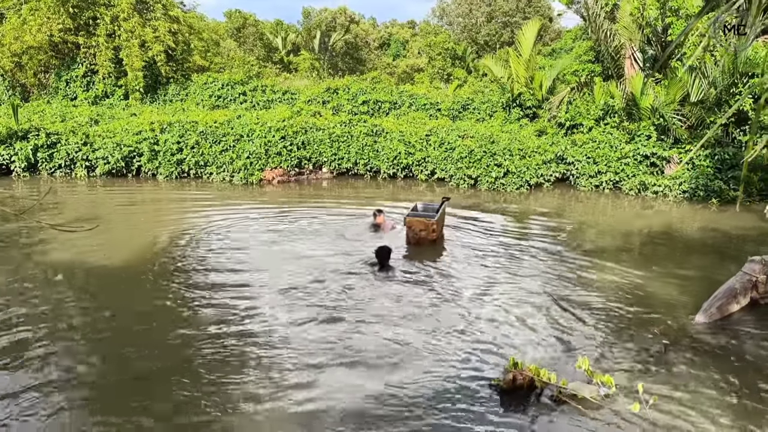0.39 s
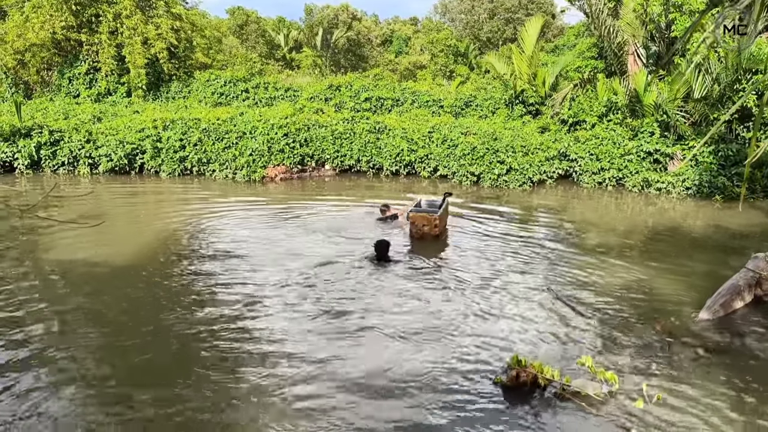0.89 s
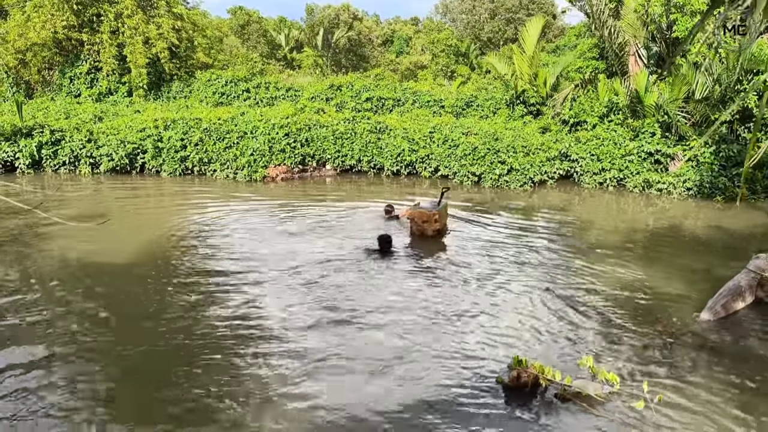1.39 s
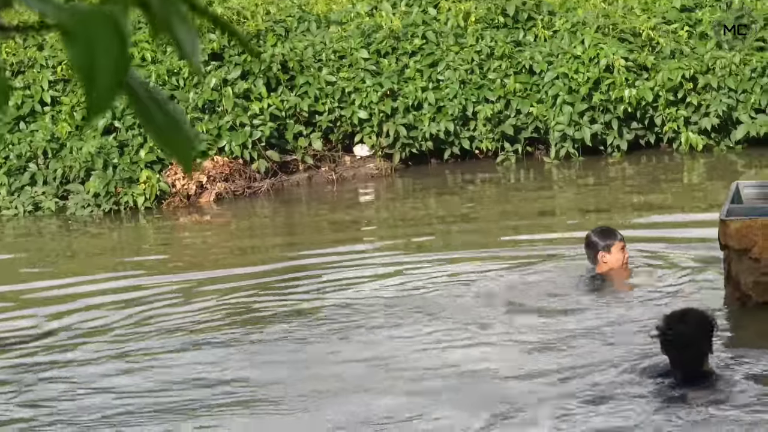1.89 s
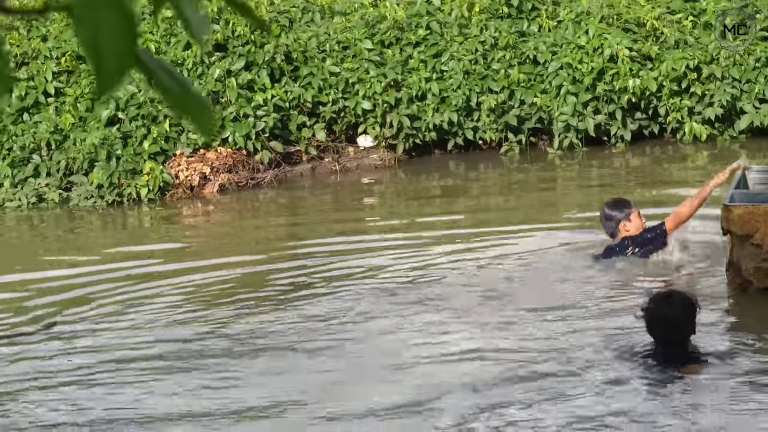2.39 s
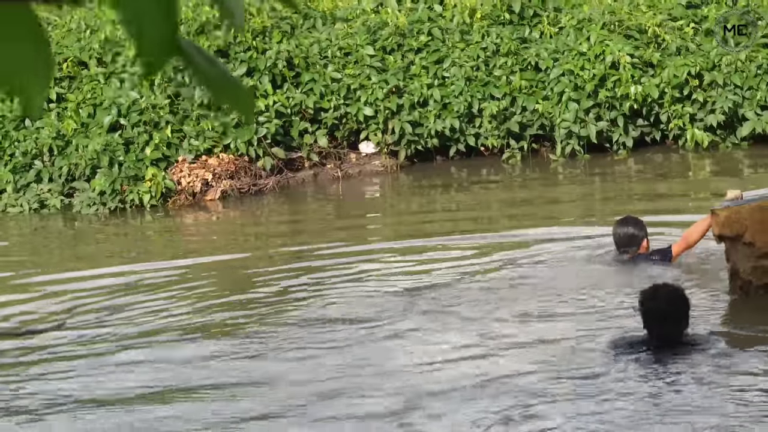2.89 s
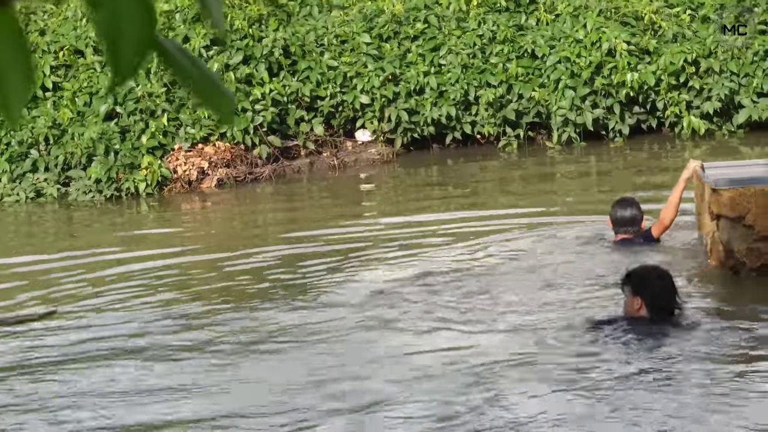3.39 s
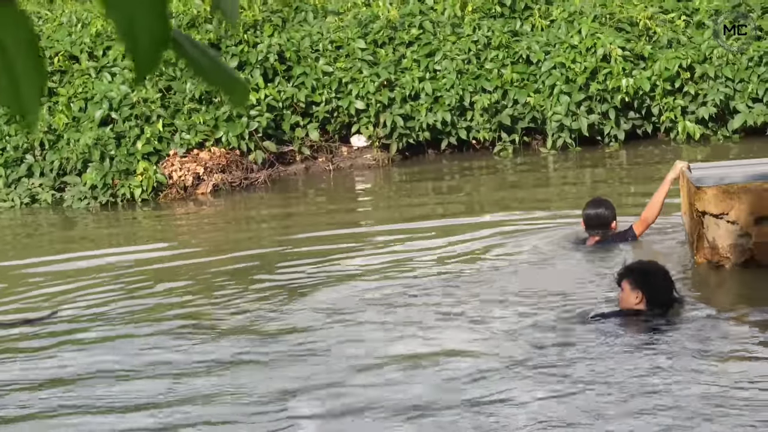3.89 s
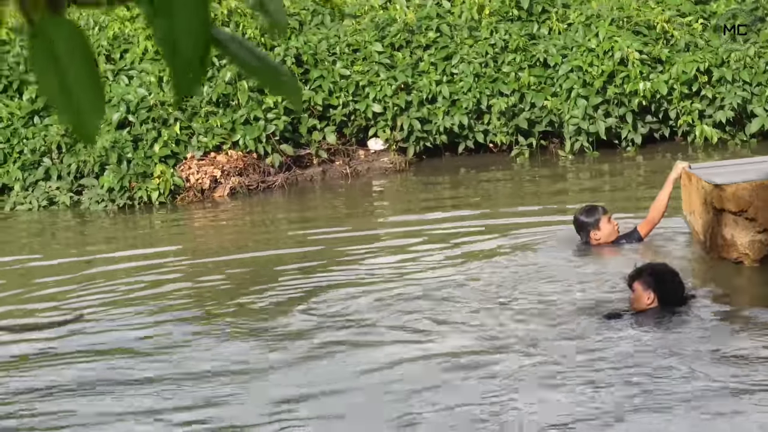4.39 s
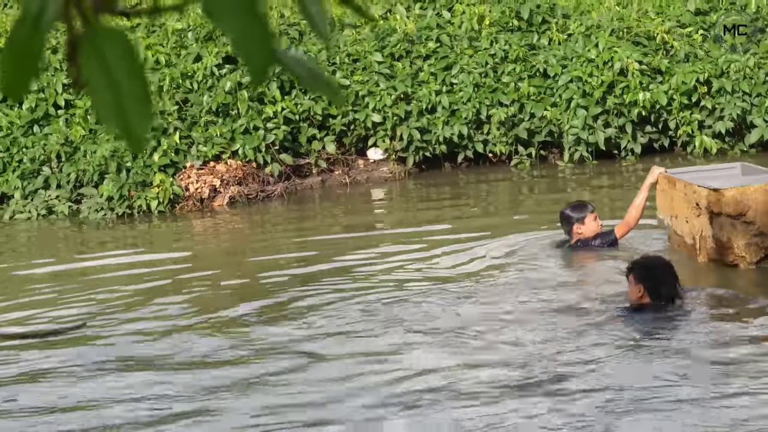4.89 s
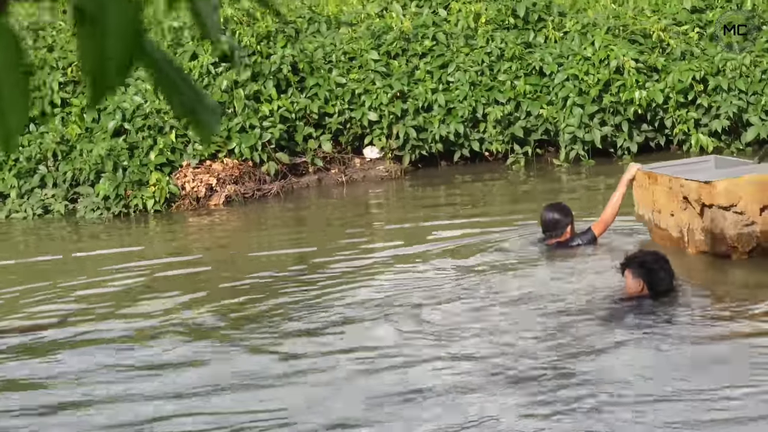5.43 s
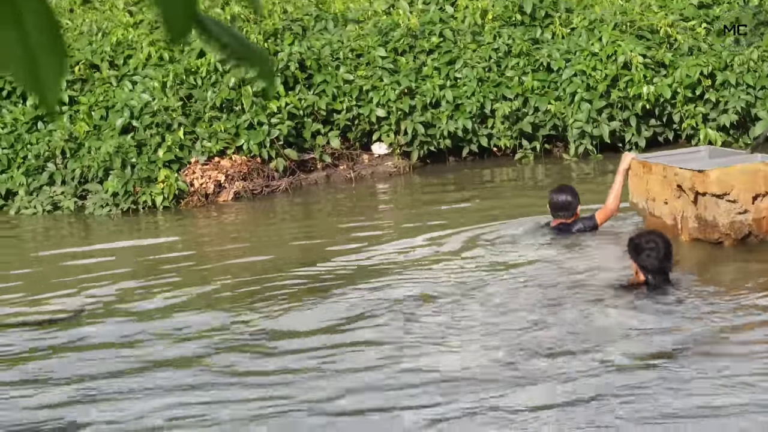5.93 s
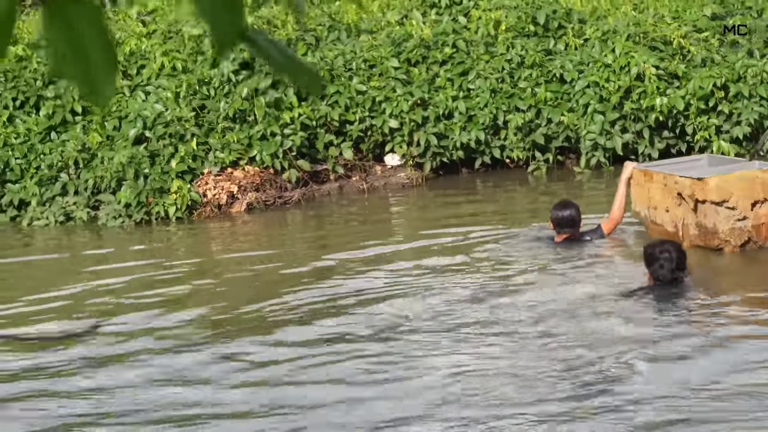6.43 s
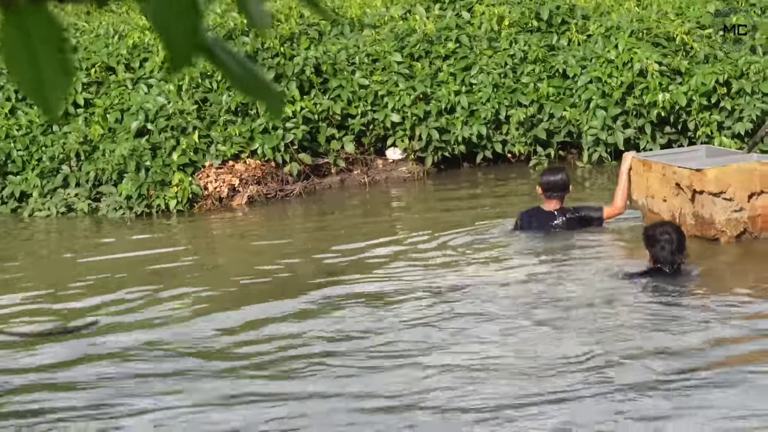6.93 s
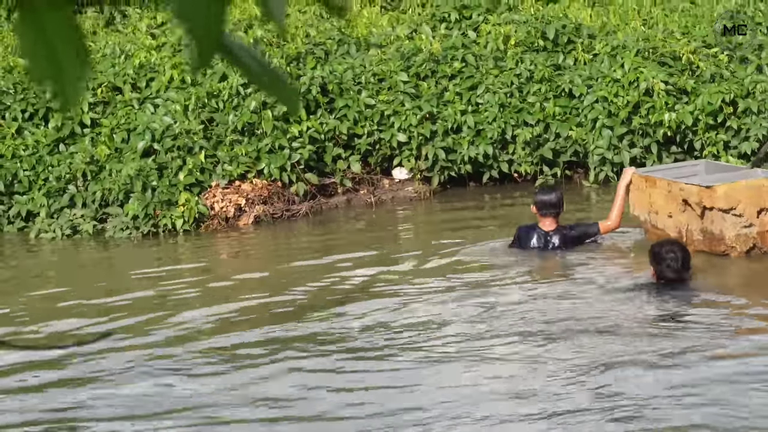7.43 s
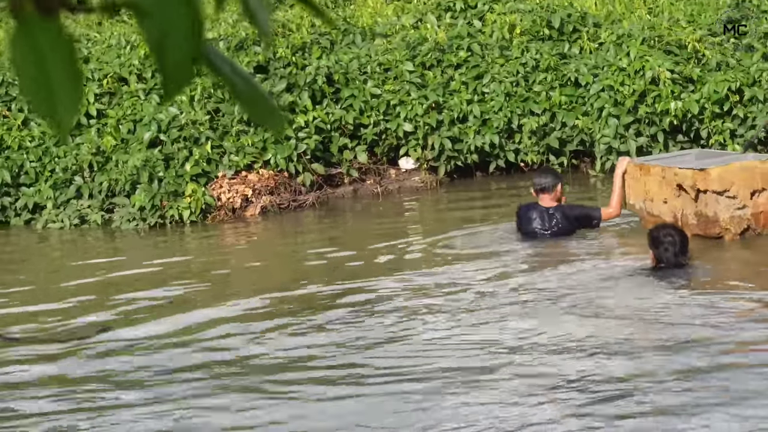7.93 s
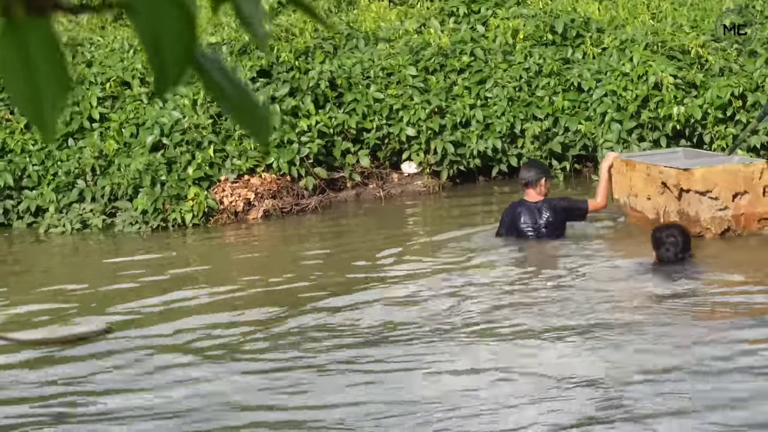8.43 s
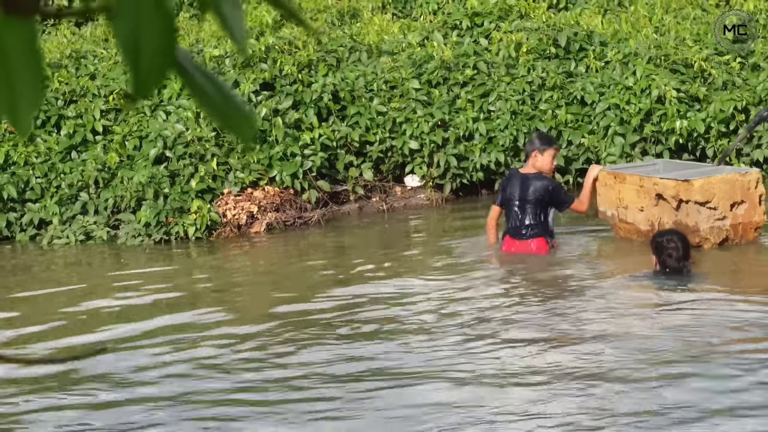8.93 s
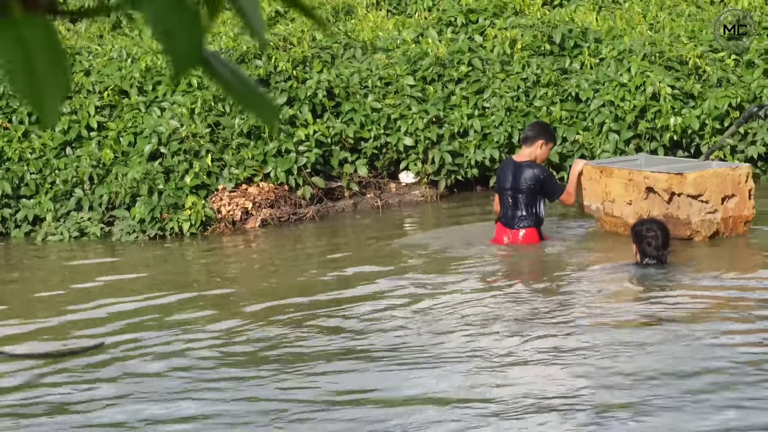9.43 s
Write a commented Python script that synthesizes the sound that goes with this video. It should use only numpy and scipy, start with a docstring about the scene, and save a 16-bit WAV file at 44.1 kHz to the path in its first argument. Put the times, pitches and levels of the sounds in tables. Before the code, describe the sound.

Songbirds call among echoing trees throughout, above faint mono hiss and an indistinct wash of far warblers. From 0 to 2 seconds, a wider stereo layer adds open air, low wind buffets mainly left around 0.4, 0.7 and 1.8 seconds, and leaf rustle with small crisp ticks leaning right. Short whistles slide around 3 to 4 kHz. Soft sparse chips become stronger and faster from 2.4 seconds, breaking at 3.6 into a rapid high trill that fades near 5.1. Faint low coos swell underneath; burred notes and quick slurs gather around 5 to 6. A second, distant trill runs from 5.5 to about 7.2. Strong clear whistles stand out near 7, followed by descending high slurs from 7.4 to 8.2. Hooked calls, upward swoops, steep falls and arched notes finish by about 9.5 seconds.

```python
"""From the start, near songbirds whistle and slur over a soft mono hiss and a blur of far warblers, all
echoing among trees. For two seconds a stereo layer adds wind buffets on the left, open air and leaf ticks.
One bird chips faster and breaks into a trill at 3.6 s; low coos and burred notes come in, and a second
bird trills far off at 5.5 s. Near the end come hooks, upward swoops, steep falls and arches.
Birds are sines on moving pitch curves; hiss, air, wind and leaves are shaped noise."""
import sys
import numpy as np
from scipy import signal
from scipy.io import wavfile
from scipy.ndimage import uniform_filter1d

SR = 44100
rng = np.random.default_rng(int(sys.argv[2]) if len(sys.argv) > 2 else 0)


def amplitude_ratio(level_db):
    """Convert a level in decibels to the matching linear amplitude (field) ratio."""
    exponent = np.asarray(level_db, float) / 20
    return 10 ** exponent


def generate_wav(signal):
    """Clip the signal to [-1, 1] and save it as 16-bit WAV at the path in sys.argv[1]."""
    frames = np.transpose(np.atleast_2d(signal))
    scaled = np.clip(frames, -1, 1) * 32767
    pcm = np.round(scaled).astype(np.int16)
    wavfile.write(sys.argv[1], SR, pcm)


N = 421596  # samples in the scene


def evened(x):
    """Scales a signal to an rms of 1."""
    return x / np.sqrt(np.mean(x ** 2) + 1e-20)


def read(points, hz):
    """Reads a curve at any frequency, along a log frequency axis."""
    f, value = np.transpose(points)
    return np.interp(np.log(hz + 1), np.log(f + 1), value)


def add(mix, s, sound):
    """Adds a sound to the mix at s seconds."""
    part = mix[max(round(s * SR), 0):][:len(sound)]
    part += sound[:len(part)]


def band(x, low_hz, high_hz, order=2):
    """Keeps only the band between two frequencies."""
    return signal.sosfilt(signal.butter(order, [low_hz, high_hz], "bandpass", fs=SR, output="sos"), x)


def whistle(rows, waver_db=2.5, edge_s=.004):
    """A sine on a smoothed pitch curve, its level wavering at random; returns its start and sound."""
    s, hz, db = np.transpose(rows)
    t = np.arange(s[0] - edge_s, s[-1] + edge_s, 1 / SR)
    hz = uniform_filter1d(np.interp(t, s, hz), 90, mode="nearest")
    phase = 2 * np.pi * (np.cumsum(hz) / SR + rng.random())
    knots = t[::200]
    waver = np.interp(t, knots, rng.standard_normal(len(knots)))
    to_nearest_end = np.minimum(t - t[0], t[-1] - t)
    edge = np.sin(np.pi / 2 * np.clip(to_nearest_end / (2 * edge_s), 0, 1)) ** 2
    level = np.sqrt(2) * amplitude_ratio(np.interp(t, s, db) + waver_db * waver)
    return t[0], level * edge * np.sin(phase)


def syllable(mix, s, db, strokes, spread=0.008):
    """Adds the strokes of one syllable, all bent in pitch by the same small random share."""
    bend = 1 + spread * rng.standard_normal()
    for stroke in strokes:
        rows = np.array(stroke) * [1, bend, 1] + [s, 0, db]
        add(mix, *whistle(rows, waver_db=0.0, edge_s=.0015))


RAMP_S, RAMP_DB = 0.0083, 1  # each end of a note is this much softer, over this time


def slur(s, length, start_hz, middle_hz, end_hz, db, swell_db=0):
    """Rows (t/s, f/Hz, level/dB) of a note whose pitch follows a parabola through three points."""
    u = np.linspace(0, 1, num=int(length * 500) + 5)  # place within the note
    hz = start_hz * (1 - u) * (1 - 2 * u)
    hz += 4 * middle_hz * u * (1 - u)
    hz += end_hz * u * (2 * u - 1)
    ramp = np.clip(np.minimum(u, 1 - u) * length / RAMP_S, 0, 1)
    return np.transpose([s + u * length, hz, db + swell_db * (u - .5) - RAMP_DB * (1 - ramp)])


def slide(s, length, start_hz, end_hz, db, swell_db=0):
    """A slur whose pitch moves in a straight line."""
    return slur(s, length, start_hz, (start_hz + end_hz) / 2, end_hz, db, swell_db)


def trill(start, gaps, levels, count):
    """Rows (t/s, one or more level/dB) of a trill, its gaps and levels read by syllable number."""
    k = np.arange(count)
    times = start + np.r_[0, np.cumsum(np.interp(k[:-1], *np.transpose(gaps)))]
    number, *columns = np.transpose(levels)
    return np.transpose([times] + [np.interp(k, number, c) for c in columns])


def noise(spectrum, patchy_db, channels):
    """Noise from random short-time spectra, its level drifting in patches of time and pitch."""
    frames, hz = N // 256 + 5, np.fft.rfftfreq(1024, 1 / SR)
    a, b, patches = rng.standard_normal((frames, 513, channels, 3)).T
    patches = uniform_filter1d(patches, 12, 1)  # smooth over frequency
    patches = evened(uniform_filter1d(patches, 14, 2))  # smooth over time
    z = (a + 1j * b) * amplitude_ratio(read(spectrum, hz)[:, None] + patchy_db * patches)
    return evened(signal.istft(z, nperseg=1024, noverlap=768)[1][:, :N])


# how long each band rings among the trees, before the slow factor: (f/Hz, time to fall 60 dB t/s)
TREES = [(1500, 1), (3000, 0.44), (5000, 0.48), (8000, 0.34), (12000, 0.05)]


def trees(x, build_s, slow=0.92, lumpy_db=3.0):
    """Sparse echoes from trunks come in clumps, build up, then each band dies at its own speed."""
    taps = np.zeros(SR)
    at = np.arange(40, SR - 20, 20)
    clumps = amplitude_ratio(lumpy_db * evened(uniform_filter1d(rng.standard_normal(len(at)), 8)))
    build_up = 1 - np.exp(-at / SR / build_s)
    scattered = at + rng.integers(0, 20, len(at))
    taps[scattered] = rng.choice([-1., 1.], len(at)) * clumps * build_up
    hz, t, z = signal.stft(taps, SR, nperseg=256)
    decay = amplitude_ratio(-60 * t / (slow * read(TREES, hz)[:, None]))
    tail = signal.istft(z * decay, SR, nperseg=256)[1]
    return signal.fftconvolve(x, tail / np.linalg.norm(tail))[:N]


# colour of the hiss: (f/Hz, level/dB per Hz, relative)
HISS = [(15, -58), (25, -15), (96, -36), (221, -8.5), (282, 0.5), (1380, -11.5), (1760, -11.5), (2370, -12),
        (3020, -10), (3550, -11.5), (4640, -11), (7740, -16), (11600, -19.5), (12900, -26), (15600, -77)]
HISS_DB = -49.5  # overall rms
# the top of the hiss comes and goes in patches: (f/Hz, patch depth level/dB)
FLICKER = [(10500, 1.67), (12500, 3.5), (14500, 7.0)]


def hiss():
    """Soft mono noise whose treble flickers more the higher it is."""
    patchy_db = read(FLICKER, np.fft.rfftfreq(1024, 1 / SR))[:, None]
    return amplitude_ratio(HISS_DB) * noise(HISS, patchy_db, channels=1)


# colour of the open air: (f/Hz, level/dB per Hz, relative)
AIR = [(15, -33), (25, -8), (86, 20), (210, 5.5), (764, 1), (1620, 2), (1860, -3), (3180, 2), (8390, -7),
       (14400, -21), (15600, -11)]
AIR_DB = -55.5  # overall rms before the closing fade
# colour of the leaf rustle: (f/Hz, level/dB per Hz, relative)
LEAVES = [(4000, -20), (5500, 3.5), (6500, -8), (8300, 3), (9500, -8), (11000, -4), (12500, -10),
          (14400, -5), (15500, -34)]
# loudness of the rustle, before the left-right balance: (t/s, level/dB)
RUSTLE = [(0, -62), (.12, -70), (.19, -60), (.52, -56), (.68, -62), (.83, -49), (.9, -58), (1.15, -62),
          (1.4, -61), (1.56, -54), (1.64, -62), (1.85, -62), (1.92, -56), (2, -70)]
# wind buffets, before the left-right balance: (t/s, level/dB, width t/s)
GUSTS = [(.415, -37, 0.035), (.68, -36, .03), (1.0, -58, 0.036), (1.5, -65, .06), (1.75, -49, 0.023),
         (1.86, -37, 0.031)]
CALM_DB = -66.5  # wind between buffets, before the balance
# leaf ticks, level before a 9 dB lift: (t/s, level/dB, f/Hz, left minus right level/dB)
TICKS = [(0.2613, -36, 8100, -11), (0.7781, -40, 8300, -10.0), (0.8, -43, 10500, -8.0),
         (0.8214, -33, 4530, -8), (0.9434, -42, 5540, -6.0), (0.9774, -40, 8350, -11),
         (1.143, -40, 4770, -7), (1.2648, -47, 10300, -4.5), (1.2989, -49, 8610, -9),
         (1.3833, -44, 5710, -5.0), (1.4282, -42, 7150, -2.0), (1.4496, -44, 7570, -6.5),
         (1.4656, -39, 8600, -7.5), (1.5125, -43, 7590, -6.5), (1.5269, -34, 14300, -4.5),
         (1.8654, -45, 8840, -1.0), (1.929, -44, 4620, -5)]
STEREO_END_S = 2.0


def wind_and_leaves():
    """Unrelated air in two channels, lumpy wind mostly left, leaves rustling more on the right, leaf ticks."""
    t = np.arange(N) / SR
    out = amplitude_ratio(AIR_DB) * noise(AIR, 1.0, channels=2)
    rustle_db = np.interp(t, *np.transpose(RUSTLE)) + np.array([[-1.5], [2.5]])
    out += noise(LEAVES, 2.8, channels=2) * amplitude_ratio(rustle_db)
    lumps = amplitude_ratio(3 * evened(uniform_filter1d(rng.standard_normal((2, N)), 900)))
    wind = evened(band(rng.standard_normal((2, N)), 50, 165, order=3) * lumps)
    gusts = amplitude_ratio(CALM_DB) + sum(amplitude_ratio(db) * np.exp(-((t - s) / width) ** 2) for s, db, width in GUSTS)
    out += wind * gusts * amplitude_ratio(np.array([[5.5], [-9]]))
    u = np.arange(900) / SR
    for s, db, hz, pan_db in TICKS:
        snap = rng.standard_normal((2, len(u))) * np.exp(-u / 0.0023)
        tick = band(snap, hz * 0.96, hz * 1.067) * 1.9 + 0.28 * band(snap, 6000, 14000)
        for side, sign in enumerate((1, -1)):
            add(out[side], s, amplitude_ratio(db + 9 + sign * pan_db / 2) * tick[side])
    return out * np.clip((STEREO_END_S - t) / .03, 0, 1)


# blur of far warblers, level before the mix: (t/s, level/dB, centre f/Hz)
CHORUS = [(0, -45, 3696), (.25, -51, 3600), (.5, -45.5, 3200), (.85, -45, 3500), (1.3, -58.5, 3430),
          (1.75, -68, 3654), (2.05, -49, 3800), (2.75, -68, 3560), (3.5, -43.5, 3695), (4.15, -39, 3303),
          (4.5, -47, 3300), (4.77, -35, 3250), (5.15, -47.5, 2996), (5.6, -40, 2895), (6.05, -52, 3566),
          (6.7, -45, 3417), (7.25, -41.5, 3785), (7.6, -57, 3565), (8, -54, 4000), (8.4, -39.5, 4270),
          (9.56, -39.5, 3090)]
CHORUS_SPREAD = 0.16  # as log pitch


def warblers():
    """Eleven far voices come and go, slurring quickly up and down about a moving centre."""
    t = np.arange(N) / SR
    times, *columns = np.transpose(CHORUS)
    db, centre_hz = (np.interp(t, times, c) for c in columns)
    knots, blur = np.arange(0, 10, .018), np.zeros(N)
    for wander, voice in rng.standard_normal((11, 2, len(knots))):
        log_bend = CHORUS_SPREAD * np.interp(t, knots, np.clip(wander, -1.8, 1.8))
        hz = centre_hz * np.exp(log_bend)
        level = np.maximum(np.interp(t, knots, voice) - .3, 0)  # silent much of the time
        blur += level * np.sin(2 * np.pi * np.cumsum(hz) / SR)
    return amplitude_ratio(db - 2.5) * evened(blur)


# straight whistled slides: (t/s, length t/s, start f/Hz, end f/Hz, level/dB)
SLIDES = [(0, .15, 2545, 2470, -59), (.001, .02, 4080, 4060, -36), (.115, .03, 4520, 4500, -56),
          (.755, .055, 3450, 4170, -38), (.807, .042, 4090, 4040, -37), (0.079, 0.033, 4100, 4100, -46),
          (.574, .032, 3880, 3860, -47), (2.131, 0.047, 4280, 3720, -50.5), (2.719, .012, 3130, 2730, -49),
          (2.862, .03, 3310, 4420, -55), (2.897, 0.019, 4590, 4420, -42), (2.962, .012, 3300, 2920, -39.5),
          (3.693, .022, 3147, 3120, -37.5), (3.723, 0.014, 3050, 3030, -39.5),
          (4.05, .018, 2930, 2820, -40), (4.109, .022, 2980, 2840, -39.5), (4.166, 0.03, 3300, 2680, -39.5),
          (4.286, 0.015, 3720, 3920, -37), (4.33, 0.036, 2960, 2960, -44), (4.367, 0.04, 3080, 2420, -39),
          (4.36, 0.033, 2420, 2120, -48), (4.42, 0.036, 2184, 1680, -48), (4.661, 0.045, 3130, 2460, -40),
          (4.663, 0.042, 3900, 3740, -39.5), (4.876, .01, 3750, 2800, -37), (5.012, .006, 4300, 5200, -40),
          (1.95, .04, 3820, 3760, -50), (5.575, .075, 4000, 3980, -46), (4.938, .02, 2730, 2140, -40),
          (5.124, 0.034, 2800, 2975, -39), (5.142, 0.035, 2410, 2650, -35.5),
          (5.381, .017, 3890, 2970, -38), (5.553, 0.011, 3260, 2730, -31),
          (5.635, 0.025, 7800, 7570, -36.5), (5.658, .024, 6730, 5170, -38), (5.78, 0.02, 5500, 4800, -39),
          (5.792, .03, 6750, 6500, -38), (5.865, 0.028, 4220, 3900, -35.5),
          (5.891, 0.013, 7230, 7440, -30.5), (6.029, .008, 3570, 2720, -42), (6.068, .02, 3780, 3050, -33),
          (6.39, .015, 4600, 4760, -40), (6.4, 0.014, 4120, 4060, -28.5), (6.42, .085, 4190, 3855, -37),
          (6.563, 0.021, 8370, 7870, -40), (6.573, 0.077, 3034, 2500, -37.5),
          (6.622, 0.016, 9300, 8440, -38), (6.655, .025, 7950, 7850, -35), (2.367, 0.052, 3920, 3740, -47),
          (7.501, .07, 3120, 3105, -52.5), (6.999, 0.12, 2600, 2560, -49), (7.055, 0.026, 4650, 4600, -42),
          (7.122, .08, 2430, 2580, -45), (7.235, 0.018, 4970, 4900, -51), (7.276, .06, 7850, 5830, -41),
          (7.625, 0.02, 3420, 3300, -46), (7.84, 0.018, 3450, 3260, -49), (8.22, 0.025, 4260, 3100, -31.5),
          (8.381, .022, 4160, 3053, -30), (8.573, .012, 4670, 4340, -29), (8.749, 0.03, 4650, 4550, -36),
          (8.804, 0.011, 2510, 2940, -44), (9.358, .035, 2160, 2380, -48), (9.393, .04, 3320, 3190, -32.5),
          (9.454, 0.031, 4650, 4525, -39), (9.538, 0.023, 3350, 4350, -28)]


def straight_slides(mix):
    """Whistles whose pitch moves in a straight line."""
    for row in SLIDES:
        add(mix, *whistle(slide(*row), waver_db=3.0))


# notes that slide onto a pitch: (t/s, length t/s, start f/Hz, held f/Hz, settling t/s, level/dB)
SETTLES = [(.265, .155, 4150, 2960, .035, -30), (5.197, 0.084, 2950, 2480, 0.0303, -30.5),
           (5.472, 0.076, 4200, 3980, 0.019, -42), (5.516, .05, 3200, 2400, .016, -29),
           (6.972, 0.065, 3450, 4520, .013, -21), (7.137, 0.092, 5500, 4150, .012, -24.5),
           (7.287, 0.096, 4050, 3760, 0.0193, -36), (6.768, 0.11, 3400, 3280, 0.0304, -36.5),
           (1.755, .1, 4400, 3700, .05, -42), (1.865, .03, 3800, 3780, .01, -43)]
SETTLE_RISE_DB = -8.5  # how much softer the slide starts


def settle(s, length, start_hz, held_hz, settle_s, db):
    """Rows (t/s, f/Hz, level/dB) of a note that closes in on its pitch and gains strength as it does."""
    rows = slide(s, length, held_hz, held_hz, db)
    left = np.exp(-(rows[:, 0] - s) / settle_s)
    return rows + np.outer(left, [0, start_hz - held_hz, SETTLE_RISE_DB])


def settling_notes(mix):
    """Whistles that slide quickly onto a pitch and hold it."""
    for row in SETTLES:
        add(mix, *whistle(settle(*row), waver_db=1.5))


# chips, level before the direct sound's gain: (t/s, level/dB)
CHIPS = [(0.422, -43), (0.5706, -44), (1.5642, -39), (1.701, -36.5), (1.84, -42), (1.9949, -39.5),
         (2.154, -42.5), (2.3052, -39.5), (2.451, -27), (2.59, -26), (2.724, -24), (2.8464, -21),
         (2.9632, -19.5), (3.0779, -18.5), (3.1922, -15.5), (3.3054, -17.5), (3.411, -18.5),
         (3.5202, -16.5)]
# strokes of a chip: rising, the thinner and higher one of the first chips, and the lead-in of the last;
# and of a trill syllable: fall, rise and held tone; each (t/s from the event, f/Hz, level/dB added)
CHIP = [(-.012, 3500, -24), (-.004, 5800, -16), (.001, 7500, -3), (.004, 8500, -7), (.007, 9100, -14)]
SOFT_CHIP = [(-.004, 6630, -16), (.0, 7750, -2.5), (.004, 8600, -1.5), (.009, 9500, -12)]
LEAD_IN = [(-.014, 6700, -19), (-.006, 8300, -18), (-.003, 10300, -30)]
FALL = [(-.006, 9400, -22), (-.002, 8900, -22), (.0, 8600, -4), (.003, 8350, -2), (.007, 7400, -3),
        (.010, 6700, -5)]
RISE = [(-.031, 4600, -19), (-.027, 5300, -13), (-.024, 5900, 2), (-.021, 6200, 1), (-.018, 6600, -3)]
HELD = [(-.018, 6600, -2), (-.014, 6850, 3), (-.007, 6900, 1), (-.002, 6800, -4)]
SOFT_UNTIL_S, LEAD_IN_FROM_S, TRILL_S = 2.4, 2.9, 3.6048
# the gap between trill syllables widens as it goes: (syllable number, gap t/s)
TRILL_GAPS = [(0, .0602), (21, .0758)]
# trill levels before the direct sound's gain: (syllable number, fall level/dB, rise level/dB, held tone
# level/dB)
TRILL_LEVELS = [(0, -30.5, -46, -38), (1, -28, -30.5, -30), (3, -26, -30.5, -27), (7, -22, -26.5, -24),
                (11.9, -21.5, -26, -28), (15, -25, -25, -34), (18, -28, -25.5, -38), (22, -29.5, -27, -40)]
LOOSENING = .0012  # the pitch scatters by this share more with each syllable


def triller():
    """One bird chips ever faster, then trills; successive syllables take three echo paths in turn."""
    out = np.zeros((3, N))
    for k, (s, db) in enumerate(CHIPS):
        if s > LEAD_IN_FROM_S:
            strokes = [CHIP, LEAD_IN]
        elif s > SOFT_UNTIL_S:
            strokes = [CHIP]
        else:
            strokes = [SOFT_CHIP]
        syllable(out[k % 3], s, db, strokes)
    for k, (s, *levels) in enumerate(trill(TRILL_S, TRILL_GAPS, TRILL_LEVELS, count=23)):
        for db, stroke in zip(levels, (FALL, RISE, HELD)):
            syllable(out[k % 3], s, db, [stroke], spread=.007 + LOOSENING * k)
    return out


# slurs that die away, keep an even level, or swell towards their end, level at the middle:
# (t/s, length t/s, start f/Hz, middle f/Hz, end f/Hz, level/dB)
FADES = [(.45, 0.076, 3000, 2990, 3080, -47.5), (5.739, 0.055, 2740, 2410, 2095, -32),
         (6.23, .085, 3180, 3190, 3190, -38)]
SLURS = [(.526, 0.028, 3460, 3830, 3700, -41.5), (2.262, 0.054, 3480, 3190, 3080, -46.5),
         (2.925, 0.033, 2410, 2440, 2820, -47.5), (4.574, 0.027, 2813, 3140, 2980, -35.5),
         (4.886, .032, 2950, 3000, 2930, -32.5), (5.411, .038, 1665, 1900, 2200, -42),
         (5.45, .018, 2200, 2000, 1776, -43), (5.762, .018, 5000, 6100, 6450, -35),
         (5.8, 0.057, 4700, 3350, 3216, -37), (5.28, 0.052, 2600, 2150, 1990, -37.5),
         (6.007, 0.013, 4270, 3955, 4530, -27), (6.032, .062, 4100, 3250, 2580, -34),
         (6.098, .022, 2700, 2550, 2430, -38), (6.104, 0.019, 4100, 3530, 4500, -28.5),
         (6.172, 0.012, 4190, 3840, 4500, -26), (5.912, .028, 5900, 4800, 4250, -29),
         (6.185, .055, 3290, 3190, 3180, -32), (6.225, .013, 3740, 4350, 3730, -45),
         (6.262, .013, 4590, 3600, 3840, -31), (6.326, 0.011, 4430, 3950, 4400, -27.5),
         (6.594, 0.026, 8100, 7500, 9200, -30.5), (6.624, .036, 8200, 7700, 8950, -31),
         (6.66, 0.028, 8950, 8190, 8640, -27), (6.687, 0.045, 8580, 7870, 8560, -27.5),
         (6.73, 0.035, 8270, 8330, 8140, -28.5), (7.041, .016, 5000, 5200, 5150, -29),
         (7.256, .034, 4310, 3440, 3260, -37.5), (7.386, .075, 4170, 4680, 4850, -34),
         (6.938, .036, 4500, 3480, 3520, -32.5), (6.905, .05, 3000, 2838, 3000, -36),
         (9.202, 0.081, 2720, 2830, 2770, -34.5), (9.427, 0.088, 2750, 2862, 2840, -34),
         (9.471, .088, 3270, 3170, 2720, -34)]
SWELLS = [(.63, .068, 2560, 2600, 2820, -35), (7.728, .077, 8000, 6460, 5480, -30),
          (7.428, .078, 7950, 6550, 5680, -33), (7.588, .066, 7850, 6350, 5680, -29),
          (7.873, 0.039, 6050, 5390, 4800, -25.5), (7.962, 0.04, 5800, 5420, 4780, -24.5),
          (8.064, .043, 5800, 5440, 4710, -22.5), (8.159, 0.047, 4750, 4483, 4437, -24),
          (8.316, .044, 4480, 4327, 4410, -22.5), (9.295, .065, 2800, 3178, 5160, -30.5)]
FADE_DB, SWELL_DB = -15.5, 7.5  # change of level from start to end


def curved_slurs(mix):
    """Whistles whose pitch bends in a curve."""
    for notes, swell_db in ((FADES, FADE_DB), (SLURS, 0), (SWELLS, SWELL_DB)):
        for row in notes:
            add(mix, *whistle(slur(*row, swell_db), waver_db=3.0))


# faint long whistles far away, level before the mix: (t/s, length t/s, start f/Hz, end f/Hz, level/dB)
DISTANT = [(.72, 0.81, 1810, 1799, -66.5), (2.499, 0.57, 1670, 1608, -65.5),
           (9.061, 0.108, 1390, 1539, -63)]
# one far syllable, a held tone and a flick upwards: (t/s from the event, f/Hz, level/dB added)
FAR_SYLLABLE = [
    [(-.045, 5646, 0.5), (-.03, 5750, -9), (-.012, 5794, 2), (-.004, 6320, 0.5), (.003, 7300, 2.5),
     (.008, 7640, -5)],
]
FAR_S = 5.5373  # start of the far trill
# far trill: (syllable number, gap t/s)
FAR_GAPS = [(0, .0624), (21, .0658), (24, .0722)]
# far trill, level before the mix: (syllable number, level/dB)
FAR_LEVELS = [(0, -54), (2, -47), (5, -39.5), (11, -36.5), (21, -37), (25, -42.5)]


def far_birds():
    """Long faint whistles that wane and waver, and a trill of 26 syllables."""
    out = np.zeros(N)
    for row in DISTANT:
        add(out, *whistle(slide(*row, swell_db=-7.5), waver_db=7.5, edge_s=.02))
    for s, db in trill(FAR_S, FAR_GAPS, FAR_LEVELS, count=26):
        syllable(out, s, db, FAR_SYLLABLE)
    return out


# throbbing notes: (t/s, length t/s, start f/Hz, end f/Hz, level/dB)
THROBS = [(1.993, .112, 3765, 3416, -42), (2.419, 0.0665, 3730, 3640, -41)]
THROBS_PER_S, THROB_DB = 61.2, 5  # the level goes this far up and down


def throbbing_notes(mix):
    """Slides whose level beats quickly up and down."""
    for row in THROBS:
        rows = slide(*row)
        rows[:, 2] += THROB_DB * np.sin(2 * np.pi * THROBS_PER_S * (rows[:, 0] - row[0]))
        add(mix, *whistle(rows))


# low dove-like tones: (t/s of the top, level/dB, rise t/s, fall t/s)
COOS = [(2.85, -65, 0.19, .06), (4.256, -58.5, .2, .04), (5.172, -57.5, .12, 0.086),
        (6.624, -55, 0.065, 0.16), (7.1, -63, .2, 0.22), (7.95, -63, .15, .3), (8.828, -54, 0.26, 0.12)]
COO_HZ, COO_ENDS_DB = 306, -11.5  # the ends are softer than the top


def coos(mix):
    """Low steady tones that swell, fade and waver."""
    for s, db, rise, fall in COOS:
        ends = db + COO_ENDS_DB
        rows = [(s - rise, COO_HZ, ends), (s, COO_HZ, db), (s + fall, COO_HZ, ends)]
        add(mix, *whistle(rows, waver_db=5.5, edge_s=.03))


# short pips, played 14 dB below this level: (t/s, level/dB, f/Hz)
PIPS = [(3.0405, -31, 5110), (3.1433, -29.5, 3890), (3.155, -25, 5060), (3.2455, -29, 3880),
        (3.3445, -30, 3950), (3.444, -24, 3950), (3.5493, -28, 3940), (3.6576, -38, 3820),
        (3.8781, -31, 3810), (3.9852, -28, 3823), (4.5545, -25.5, 4210)]
PIP_S = 0.013  # between the two points of a pip


def pips(mix):
    """Very short whistles that sink slightly in pitch and level."""
    for s, db, hz in PIPS:
        add(mix, *whistle([(s, hz, db - 14.0), (s + PIP_S, hz * .97, db - 16.5)]))


# burred notes: (t/s, length t/s, start f/Hz, middle f/Hz, end f/Hz, level/dB)
BURRS = [(5.172, 0.12, 2900, 3363, 3050, -31), (5.694, .046, 3900, 3690, 3250, -31),
         (5.566, .054, 2500, 2400, 2500, -33), (8.81, 0.094, 2240, 2120, 2137, -47),
         (9.209, 0.105, 1943, 2010, 1955, -52)]
FLICKS_PER_S, FLICK_DEPTH = 92, 0.273  # average rate; depth as a share of the pitch


def burr(rows):
    """A sine whose pitch drops through each flick and jumps back while the level dips."""
    s, *columns = np.transpose(rows)
    t = np.arange(s[0], s[-1], 1 / SR)
    hz, db = (np.interp(t, s, c) for c in columns)
    uneven = 1 + 3.84 * uniform_filter1d(rng.standard_normal(len(t)), 400)
    place = np.cumsum(FLICKS_PER_S * uneven) / SR % 1  # 0 to 1 within each flick
    tone = np.sin(2 * np.pi * np.cumsum(hz * (1 + FLICK_DEPTH * (.5 - place))) / SR)
    return s[0], 2 * amplitude_ratio(db) * np.sin(np.pi * place) * tone


def burred_notes(mix):
    """Slurs made of quick down-flicks."""
    for row in BURRS:
        add(mix, *burr(slur(*row)))


# hooks over the top, dips that swoop up (timed at the bottom), steep falls that open a phrase: (t/s, level/dB)
HOOKS = [(8.2114, -31), (8.3624, -29.5)]
SWOOPS = [(8.488, -23), (8.652, -26)]
ZIPS = [(8.8034, -25.5), (8.9411, -27), (9.071, -24.5)]
# their shapes: (t/s from the event, f/Hz, level/dB added)
HOOK = [
    [(-.005, 4780, 10), (.0, 5840, -12), (.005, 6580, -16), (.01, 5600, -5.5), (.015, 4280, 6)],
]
SWOOP = [
    [(-.024, 4080, -11), (-.006, 3420, -5), (.001, 3380, -6), (.018, 4250, -1), (.055, 4730, 1),
     (.077, 5260, -2)],
]
ZIP = [
    [(-.002, 6920, -35.5), (.002, 5244, -5.5), (.006, 4000, -3.5), (.011, 3044, -9.5)],
]
# arches with a quick rise and a longer fall, timed at the top: (t/s, level/dB, top f/Hz)
ARCHES = [(8.835, -28, 3600), (8.973, -26, 3800), (9.104, -25, 3830)]
# shape of an arch: (t/s from the top, share of the top pitch, level/dB added)
ARCH = [(-.022, .82, -9), (-.012, .94, -3), (0, 1.001, 0), (.014, .94, -2), (.04, .77, -3)]


def shaped_calls(mix):
    """Short calls that repeat a fixed pitch shape."""
    for events, shape in ((HOOKS, HOOK), (SWOOPS, SWOOP), (ZIPS, ZIP)):
        for s, db in events:
            syllable(mix, s, db, shape)
    for s, db, top_hz in ARCHES:
        syllable(mix, s, db, [np.array(ARCH) * [1, top_hz, 1]])


def singers():
    """All the songbirds near enough to be heard directly, and the coos."""
    out = np.zeros(N)
    for voice in (straight_slides, settling_notes, curved_slurs, throbbing_notes,
                  coos, pips, burred_notes, shaped_calls):
        voice(out)
    return out


# how much echo the singers carry, as they sit nearer or deeper in the wood: (t/s, relative level/dB)
DEPTH = [(0, 1), (1, 1), (1.8, 3), (2.6, 0.1), (3.5, 0.1), (4.5, 2), (5.3, 1), (5.9, -1), (6.5, 0.1),
         (6.9, -3), (7.05, -6), (7.3, -4), (7.45, 1), (8.1, 0.1), (8.5, 0.1), (9, -1), (9.56, 0.1)]
# the trilling bird's direct sound weakens as it goes: (t/s, relative level/dB)
DIRECT = [(1.5, 1), (2.4, 0.1), (3.6, 0.1), (4.3, -1), (5.1, -5)]
MIRROR_HZ = 16000


def scene():
    """The mono chorus with echoes set for each group, the hiss, and the stereo wind and leaves."""
    t = np.arange(N) / SR
    near, paths, far, blur = singers(), triller(), far_birds(), warblers()
    depth = amplitude_ratio(np.interp(t, *np.transpose(DEPTH)))
    direct = amplitude_ratio(np.interp(t, *np.transpose(DIRECT)) - 3)
    wood = near + amplitude_ratio(-10) * trees(near, 0.0013, slow=0.15, lumpy_db=-4.5)  # branches close by
    wood += amplitude_ratio(-7.5) * trees(near * depth, 0.0048, slow=1.73, lumpy_db=1.0)
    for path in paths:
        wood += direct * path
        wood += amplitude_ratio(-11) * trees(path, .001, slow=.12, lumpy_db=3.0)
        wood += amplitude_ratio(-4) * trees(path, 0.0024, slow=1.43, lumpy_db=2.0)
    wood += amplitude_ratio(-10) * far + amplitude_ratio(-8) * blur
    wood += amplitude_ratio(-2.5) * trees(far + blur, 0.0011, slow=1.03, lumpy_db=3.0)
    # a faint upside-down image of the song shows in the treble
    mirrored = wood * np.cos(2 * np.pi * MIRROR_HZ * t)
    wood += amplitude_ratio(-28) * band(mirrored, 7700, 10700)
    return wood + hiss() + wind_and_leaves()


def band_limit(x):
    """A steep low-pass at the top of the band."""
    return signal.sosfilt(signal.butter(12, 15740, fs=SR, output="sos"), x)


def record(dry):
    """Cuts the treble above 15.1 kHz to finish the mix."""
    low_pass = signal.firwin(301, 15100, fs=SR)
    limited = signal.oaconvolve(dry, low_pass[None], "same")
    return band_limit(limited)


dry = scene()
out = record(dry)
generate_wav(out)
```